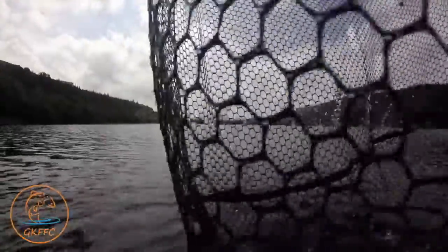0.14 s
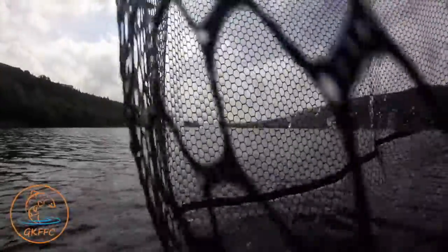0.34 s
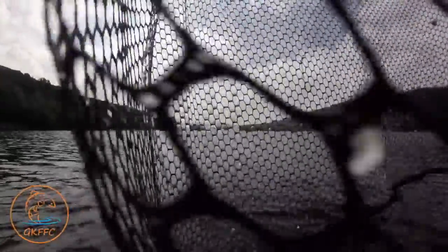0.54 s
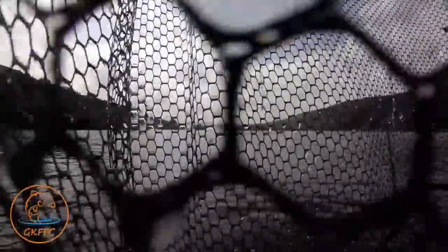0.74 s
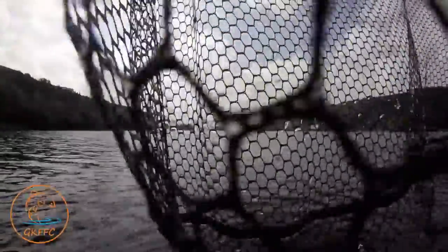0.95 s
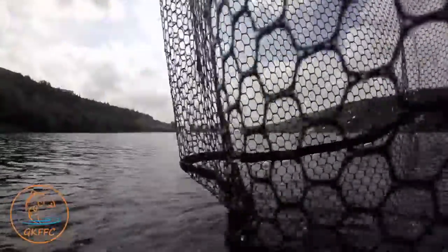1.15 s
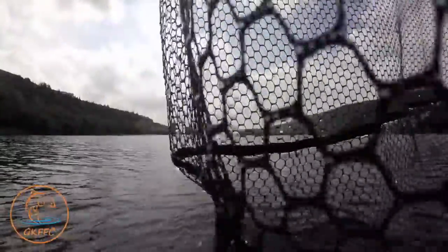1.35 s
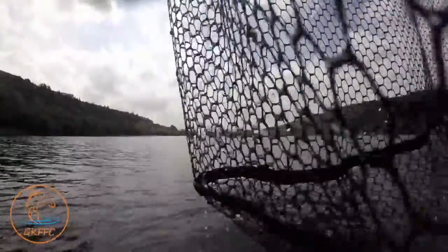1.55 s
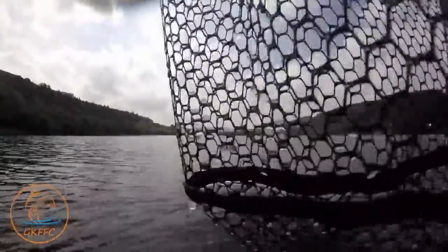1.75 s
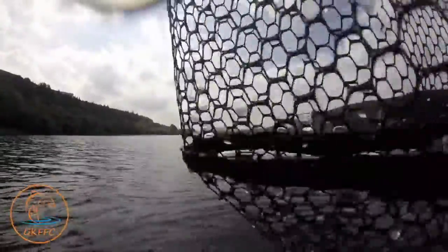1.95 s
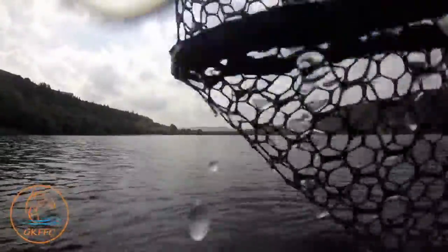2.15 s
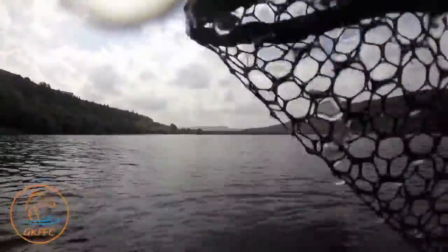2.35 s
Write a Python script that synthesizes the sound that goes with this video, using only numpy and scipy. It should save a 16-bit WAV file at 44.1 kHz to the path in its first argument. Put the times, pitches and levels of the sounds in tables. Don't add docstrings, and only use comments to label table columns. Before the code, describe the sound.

Wet netting drags roughly across a small plastic case at a lake edge, knots clicking and threads snapping, low thumps from handling, then it lifts clear and leaves a muffled dull hum; microphone sealed inside the case.

```python
import sys
import numpy as np
from scipy import signal
from scipy.fft import rfft, irfft, next_fast_len
from scipy.io import wavfile
from scipy.ndimage import uniform_filter1d, map_coordinates

SR = 44100
rng = np.random.default_rng(int(sys.argv[2]) if len(sys.argv) > 2 else 0)


def to_linear_factor(level_db):
    exponent = np.asarray(level_db, float) / 20
    return 10 ** exponent


def to_wav(s):
    ch = np.atleast_2d(s).T
    pcm = np.round(np.clip(ch, -1, 1) * 32767)
    wavfile.write(sys.argv[1], SR, pcm.astype(np.int16))


N = 110250

LEAVE_S = 2.195


def unit(x):
    return x / np.sqrt(np.mean(x ** 2) + 1e-20)


def along(points, hz):
    f, v = np.transpose(points)
    return np.interp(np.log(hz + 1), np.log(f + 1), v)


def curves(rows):
    s, *columns = np.transpose(rows)
    return [np.interp(np.arange(N) / SR, s, c) for c in columns]


def wobble(rate):
    position = np.clip(np.arange(N) * rate / SR, 0, 1999)
    return map_coordinates(rng.standard_normal(2000), [position])


def filtered(x, response):
    m = next_fast_len(N + SR // 2)
    return irfft(rfft(x, m) * response(np.fft.rfftfreq(m, 1 / SR)), m)[..., :N]


def coloured_noise(points):
    return unit(filtered(rng.standard_normal(N), lambda f: to_linear_factor(along(points, f))))


def peak(f, hz, width_hz):
    return (1j * f * width_hz / (hz * hz - f * f + 1j * f * width_hz)) ** 2


def rung(burst, hz, width_hz):
    f = np.fft.rfftfreq(len(burst), 1 / SR)
    tone = irfft(rfft(burst) * peak(f, hz, width_hz), len(burst))
    return tone * np.linalg.norm(burst) / np.linalg.norm(tone)


def step(s, width_s=0.0089):
    return np.clip((np.arange(N) / SR - s) / width_s + 0.5, 0, 1)


def add(track, s, sound):
    part = track[round(s * SR):][:len(sound)]
    part += sound[:len(part)]


def air():
    # frequency in Hz, level in dB per Hz.
    air_colour = [(20, -7.5), (120, -10), (350, -16), (1500, -24), (2200, -26.5), (6000, -37),
                  (15500, -51.5)]
    swell_db = 0.8 * (wobble(2.5) + wobble(25.66))
    return coloured_noise(air_colour) * to_linear_factor(-55 + swell_db)


def trickle():
    when, pitch, size = rng.random((3, 3000, 1))
    t = np.arange(200) / SR
    hz = 6240 * np.exp(0.466 * 4 * (pitch - 0.5))
    decay = np.exp(-t * hz / 5.9)
    grains = to_linear_factor(10 * size) * decay * np.sin(2 * np.pi * hz * t)
    at = (when * LEAVE_S * SR).astype(int) + np.arange(len(t))
    return to_linear_factor(-69.5) * unit(np.bincount(at.ravel(), grains.ravel(), N)[:N])


def drops():
    # start in seconds, peak level in dB,
    # frequency in Hz, decay by 60 dB in seconds.
    falls = [(.045, -52.5, 3670, 0.012), (.047, -52, 3110, 0.013), (0.071, -52, 3300, 0.0074),
             (0.0995, -47, 2740, 0.014), (.2, -59, 815, 0.047), (0.214, -55, 1120, 0.057),
             (.236, -60.5, 525, 0.086), (1.753, -57, 1029, 0.044), (1.785, -57, 814, 0.065),
             (2.165, -60, 7100, 0.024), (2.428, -54.5, 1040, 0.021), (2.432, -56.5, 1490, 0.037)]
    out, t = np.zeros(N), np.arange(SR // 20) / SR
    for s, db, hz, t60 in falls:
        flutter = 1 + 0.56 * unit(uniform_filter1d(rng.standard_normal(len(t)), size=60))
        bubble = flutter * np.sin(2 * np.pi * hz * t * (1 + 0.029 * t / t60))
        splash = 0.21 * rng.standard_normal(len(t)) * to_linear_factor(-60 * t / 0.0017)
        shape = to_linear_factor(db + 17.5 - 60 * t / t60) * (1 - np.exp(-t / 0.0027))
        add(out, s, shape * (bubble + splash))
    return out


def jolts():
    # start in seconds, peak level in dB, frequency in Hz, decay by 60 dB in seconds.
    thumps = [(0.251, -44.5, 106, .15), (.3, -46, 36.3, 0.26), (0.442, -34, 101.3, 0.21),
              (0.53, -19.5, 48, 0.061), (0.701, -37.5, 83.9, 0.35), (0.738, -31, 38.4, 0.11),
              (1.502, -39, 62, 0.27), (1.583, -30, 99.2, 0.24), (1.661, -33.5, 39.7, 0.21),
              (1.766, -38, 35.7, 0.69), (1.802, -32, 81.5, 0.21), (1.877, -38, 72.6, 0.29),
              (2.036, -19, 42.3, 0.11), (2.098, -20.5, 65.7, 0.088), (2.112, -18.5, 164, 0.034),
              (2.159, -41, 48, 0.36)]
    # frequency in Hz, level in dB.
    rumble_colour = [(8, -35), (25, 9), (100, 1.5), (220, -7), (600, -39)]
    attack_s = 0.0058
    out, t = np.zeros(N), np.arange(SR // 2) / SR
    drift = 1 + 0.089 * wobble(29.81)
    for s, db, hz, t60 in thumps:
        turns = np.cumsum(np.resize(drift[round(s * SR):], len(t))) * hz / SR
        shape = to_linear_factor(db + 0.5 - 60 * t / t60) * (1 - np.exp(-t / attack_s)) ** 2
        add(out, s, shape * np.sin(2 * np.pi * turns))
    motion = unit(abs(uniform_filter1d(abs(out), size=SR // 12)))
    shake = motion ** 0.7 + 0.25
    return out + coloured_noise(rumble_colour) * shake * to_linear_factor(-53 + 2 * wobble(14.35))


def case(dull, bright):
    # frequency in Hz, width in Hz, level in dB.
    face_a = [(518, 42, -0.5), (815, 33, 9), (1130, 54, 11), (1622, 340, 23), (2400, 340, 22),
              (3250, 760, 1), (6260, 690, -0.5), (8370, 500, -12.5)]
    face_b = [(1670, 264, 15), (1865, 210, 11), (2162, 710, 16.5), (4000, 350, 3), (4750, 170, -3),
              (6250, 270, -6), (7510, 700, -5.5), (7940, 540, -4.5), (12340, 5900, -16.5)]
    face_c = [(849, 41, -8), (1763, 560, 7.5), (2550, 760, 11), (3450, 780, 2), (3920, 490, -1),
              (6220, 2030, -5.5), (8300, 3600, -24), (12050, 2200, -13.5)]
    face_d = [(1680, 530, 6.5), (2490, 310, 4.5), (3580, 1060, -8), (6800, 3000, -22), (11700, 2900, -33)]
    # frequency in Hz, gain in dB.
    shell = [(250, 29), (500, 18), (1000, 3), (1500, -2.5), (9000, 0), (15000, -11.5)]
    move_times = [
        0.46,
        1.057,
        1.997,
    ]
    bright_hz, move_s, between_db = 3300, 0.24, -33.5

    def low(f):
        return 1 / (1 + 1j * f / bright_hz) ** 2

    def high(f):
        return -(1j * f / bright_hz) ** 2 * low(f)

    force = filtered(dull, low) + filtered(bright, high)
    moves = [1, *[step(s, move_s) for s in move_times], 0]
    grid_hz = np.fft.rfftfreq(4096, 1 / SR)
    out = np.zeros(N)
    for face, arrive, leave in zip((face_a, face_b, face_c, face_d), moves, moves[1:]):
        def body(f):
            modes = sum(to_linear_factor(db) * peak(f, hz, width) for hz, width, db in face)
            return to_linear_factor(along(shell, f)) * (to_linear_factor(between_db) + modes)

        loudness = np.sqrt(np.mean(abs(body(grid_hz)) ** 2))
        out += filtered(force * (arrive - leave), body) / loudness
    return out


def snaps():
    # start in seconds, peak level in dB, brightness in dB, knock in dB.
    releases = [(.449, -24, 8, -13), (0.4672, -27, 9, -10), (0.6176, -22, -4, -14), (0.701, -26, 12, 2),
                (0.8598, -14.5, 5, -6.5), (1.299, -31, -3, -14), (1.7655, -32, 8.5, -1),
                (1.9339, -32.5, 18, -22), (1.9658, -16, 2.5, -15), (2.0389, -16, -14, -3.5),
                (2.1185, -19, 12, -1.5)]
    snap_s, knock_hz = 0.00006, 610
    dull, bright, knock = np.zeros((3, N))
    t = np.arange(SR // 200) / SR
    for s, db, bright_db, knock_db in releases:
        blow = to_linear_factor(db - 1) * np.exp(-t / snap_s) * (1 + 0.2 * rng.standard_normal(len(t)))
        crack = to_linear_factor(db - 1 + bright_db) * np.exp(-t / snap_s / 4) * rng.standard_normal(len(t))
        add(dull, s, blow)
        add(bright, s, crack)
        add(knock, s, blow * to_linear_factor(knock_db + 7))
    return dull, bright, filtered(knock, lambda f: peak(f, knock_hz, 3 * knock_hz))


def knots():
    # time in
    # seconds, peak level in dB, ring in Hz, brightness in dB, length in ms.
    catches = [(0.1773, -25.5, 2500, -24, 4.6), (0.1981, -27.5, 2420, -9, 3.3), (0.2174, -24.5, 2420, 2, 8.7),
               (0.2427, -23, 1573, 20.5, 6.2), (0.2894, -28.5, 2310, -16, 7.2), (0.4817, -22, 1680, 3, 3.2),
               (0.601, -31, 2210, 23.5, 2.2), (0.617, -17, 1920, 13.5, 5.8), (0.6405, -18, 2100, 9, 2.05),
               (0.7015, -23, 2340, 13, 6.2), (0.8312, -28, 8250, 15, 7.3), (0.8912, -28, 1970, 7, 9.5),
               (1.097, -34.5, 2450, -15, 17.3), (1.1856, -37.5, 2260, 7, 7.8), (1.2356, -36.5, 2130, 8, 9.5),
               (1.4872, -34, 2690, 10, 12.3), (1.512, -32.5, 2670, 9, 8.2), (1.5486, -26.5, 2790, 8.5, 8.2),
            (1.5937, -26.5, 2530, 2.7, 7.4), (1.6108, -32.5, 2230, 15, 5.6), (1.65, -24, 2800, 6.7, 7.3),
            (1.674, -30.5, 2800, 6.5, 17), (1.6929, -31, 2550, 3.5, 3.5), (1.7122, -29.5, 2720, 14, 7.5),
            (1.7492, -28.5, 2110, 11, 9.7), (1.7644, -21, 2870, 5.2, 4.4), (1.7997, -25.5, 1860, 2.5, 8.5),
            (1.933, -28, 2650, 10.4, 7.3), (1.942, -24, 2280, 5.3, 5.4), (1.9658, -26, 2700, 2.5, 4.4),
            (1.986, -30.5, 1850, 2.2, 8.2), (2.0346, -18.5, 2200, 0.76, 7.5),
            (2.0685, -25.5, 1920, 8.5, 5.5), (2.0766, -27, 1610, 3.9, 5.4), (2.1122, -15, 1670, 0.87, 8),
            (2.1859, -36, 1670, 1.7, 3),
               (0.248, -27.5, 2410, 17, 6.4), (0.333, -31.5, 2380, 13, 4), (.339, -28.5, 2570, -6, 12.3),
             (0.495, -23, 2190, 3, 4.8), (.506, -29, 2110, 11, 11), (0.545, -25.5, 2250, 15, 6.2),
             (.5645, -24, 2120, 7, 4), (0.568, -31.5, 8380, 3, 25), (0.575, -44, 2220, 6, 10),
             (.596, -26, 8160, 10, 8.1), (0.6037, -19.5, 1770, -7, 5.6), (.624, -28, 2120, 13, 4.2),
             (.665, -24, 2290, 7, 7.6), (.7215, -27, 1800, 3, 6), (.781, -30, 2150, 12, 11.5),
             (.831, -25, 2380, 18.5, 5.95), (.917, -32, 2670, 10, 6.1), (.942, -37, 2300, -4, 10.5),
             (1.01, -34, 1530, 5, 8.5), (1.117, -38, 2580, -8, 18), (1.277, -41, 2340, 10.5, 4.7),
             (1.332, -38.5, 2680, 3, 5.9), (1.394, -49, 2500, 1, 5.3), (1.424, -39, 2620, 4, 14.5),
             (1.455, -43, 3800, 3, 5.1), (1.752, -28, 4350, 11.5, 10.1), (1.792, -28, 2880, 6.5, 14.4),
             (1.807, -32, 3400, 10, 8), (1.82, -26, 2240, 4, 5), (1.888, -31, 2670, 11.5, 6.1),
             (1.915, -35, 2500, -7, 3), (1.949, -30, 2800, -7, 3.3), (1.994, -25, 2540, -6, 5.43),
             (2.105, -33, 1700, 11, 5.5), (2.166, -33.5, 1670, -2, 3.9)]
    thud_hz = 544
    dull, bright, ring = np.zeros((3, N))
    t = np.arange(SR // 20) / SR
    for s, db, hz, bright_db, ms in catches:
        start = s - 0.28 * ms / 1000
        u = t / (ms / 1000)
        shape = np.minimum(u / 0.62, 1) ** 2 * np.exp(-u ** 2.36)
        grain_db = 2 * unit(uniform_filter1d(rng.standard_normal(len(t)), size=50))
        burst = rng.standard_normal(len(t)) * to_linear_factor(grain_db) * shape
        burst *= to_linear_factor(db - 12) * np.linalg.norm(shape) / np.linalg.norm(burst)
        add(dull, start, burst)
        add(bright, start, burst * to_linear_factor(bright_db))
        add(ring, start, to_linear_factor(4.5) * rung(burst, hz, 600))
        thud_db = -16.5 + (0.77 - 1) * (db + 22.5)
        add(ring, start, to_linear_factor(thud_db) * rung(burst, thud_hz, 2.6 * thud_hz))
    return dull, bright, ring


def patchy(x):
    z = signal.stft(x, nperseg=256)[2]
    field = uniform_filter1d(rng.standard_normal(z.shape), size=4, axis=0)
    field = uniform_filter1d(field, size=6, axis=1)
    return signal.istft(z * to_linear_factor(1.8 * unit(field)), nperseg=256)[1][:N]


def threads():
    # time in seconds, pressure in dB, brightness in dB.
    drag = [(.17, -63.5, 20), (.25, -46, 15), (.35, -50, 12), (.425, -54, 15), (.46, -44, 9.5),
            (.56, -39, 12), (.65, -35.5, 10), (.76, -41, 9.5), (.95, -36.5, 4), (1.02, -45, -0.5),
            (1.12, -51, 0.5), (1.37, -60.5, 0), (1.46, -48.5, -2.5), (1.72, -46.5, 1.5), (1.8, -40, -3),
            (1.9, -48, 0), (2.02, -43.5, 4), (2.19, -52, 6)]
    touch_s, slips_per_s = 0.18, 2100
    pressure_db, bright_db = curves(drag)
    slipping = rng.random((2, N)) < slips_per_s / SR
    size_db = 3 * np.minimum(rng.exponential(size=(2, N)), 3)
    direction = np.sign(rng.standard_normal((2, N)))
    coarse, fine = unit(slipping * to_linear_factor(size_db) * direction) + to_linear_factor(-4) * rng.standard_normal((2, N))
    clump_db = -0.6 * 2 * np.tanh(wobble(32) / 2) + 1.5 * wobble(130)
    fine_db = 0.7 * clump_db + 2 * wobble(62)
    press = to_linear_factor(pressure_db) * step(touch_s) * (1 - step(LEAVE_S))
    dull = patchy(unit(coarse * to_linear_factor(clump_db)))
    bright = patchy(unit(fine * to_linear_factor(fine_db)) * to_linear_factor(bright_db))
    return dull * press, bright * press


def scene():
    dull, bright, ring = np.add(knots(), snaps())
    rub_dull, rub_bright = threads()
    contact = case(dull + rub_dull, bright + rub_bright) + ring
    return (contact + jolts() + drops() + trickle() + air())[None]


def band_limit(x):
    return signal.sosfilt(signal.butter(12, 15610, fs=SR, output="sos"), x)


def record(dry):
    mix = filtered(dry, lambda f: f < 15560)
    return band_limit(mix)


dry = scene()
out = record(dry)
to_wav(out)
```